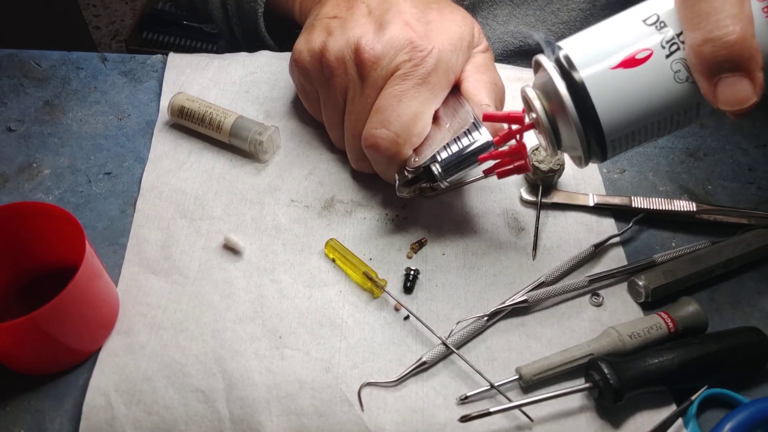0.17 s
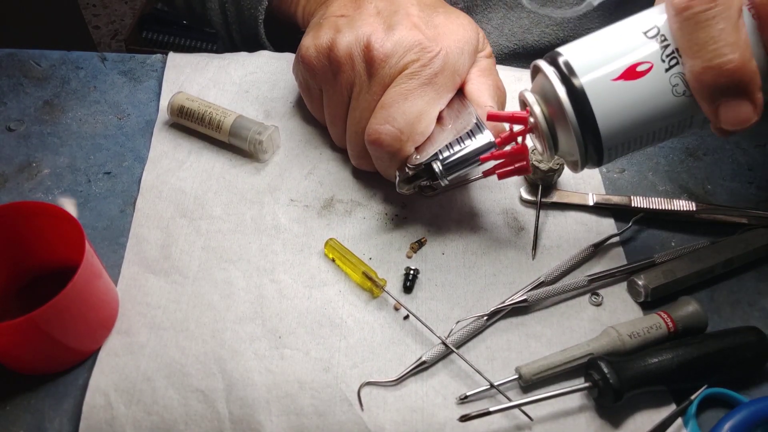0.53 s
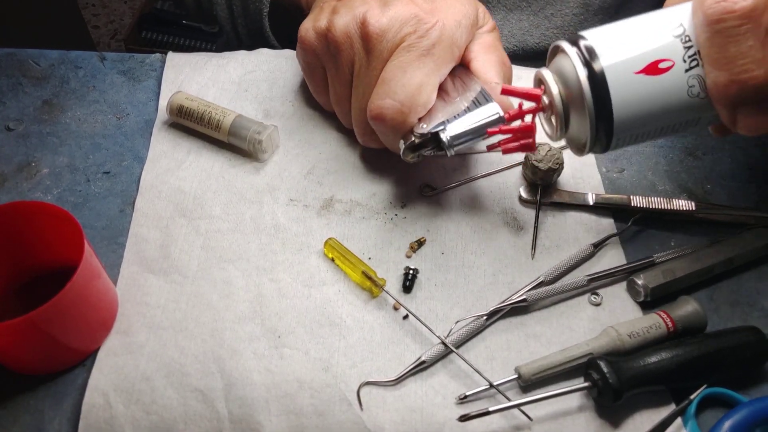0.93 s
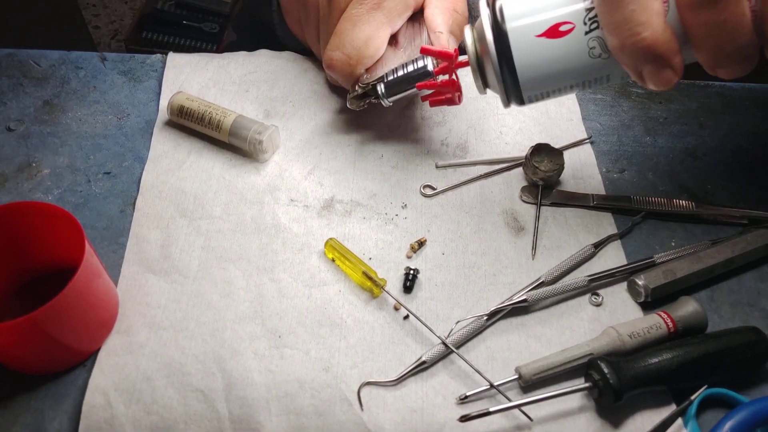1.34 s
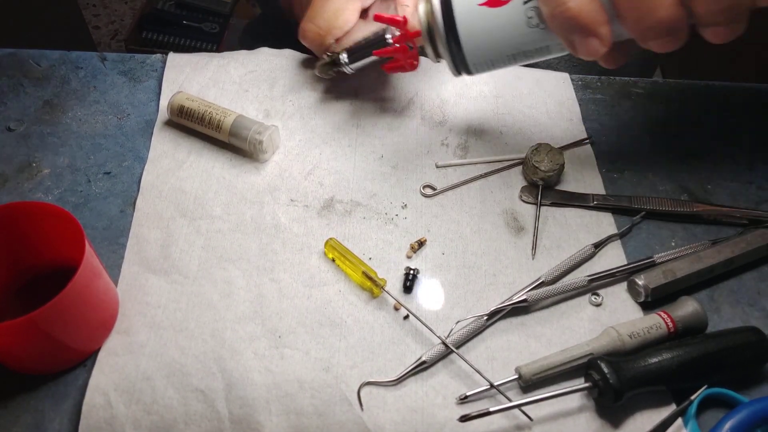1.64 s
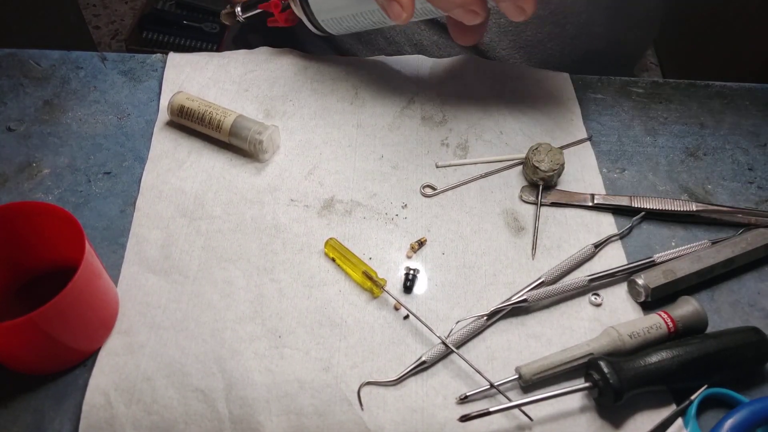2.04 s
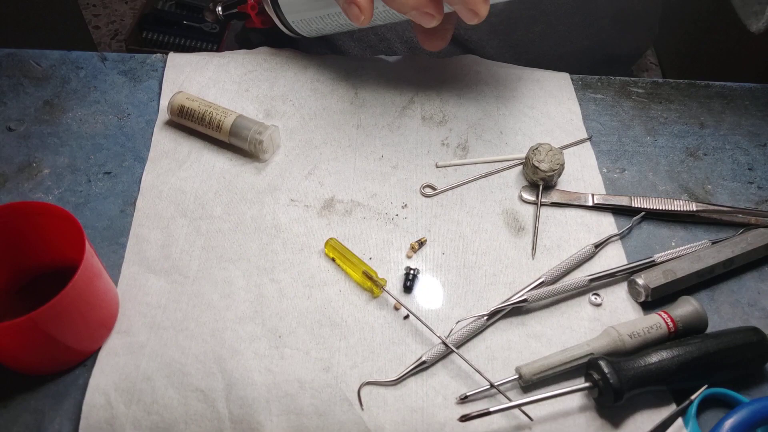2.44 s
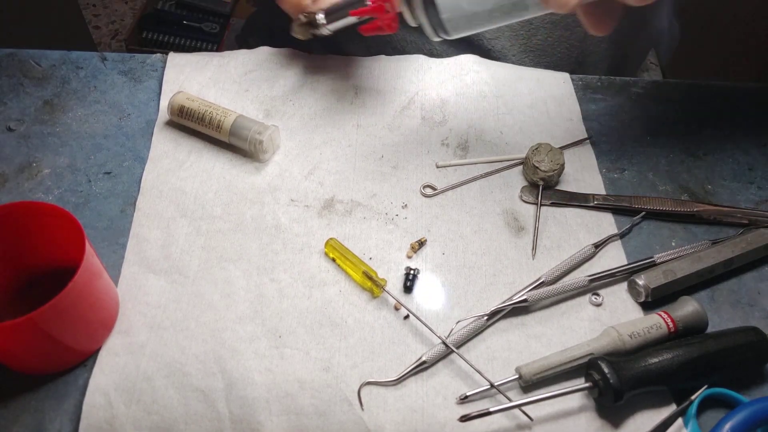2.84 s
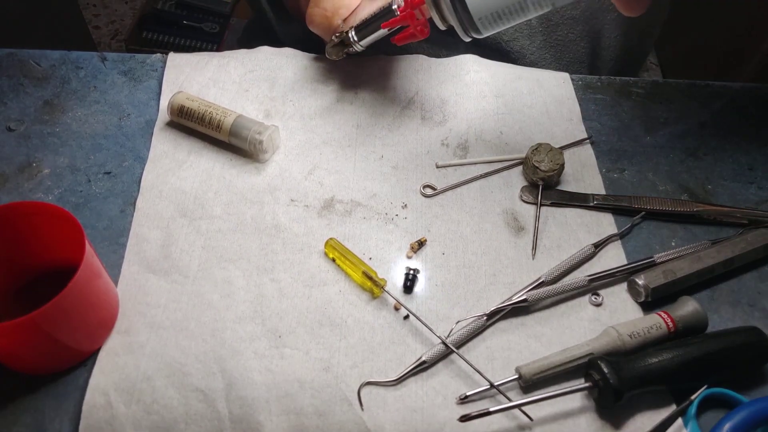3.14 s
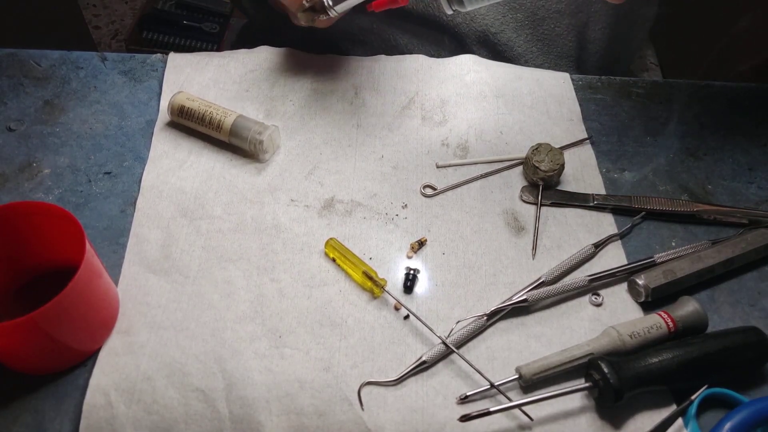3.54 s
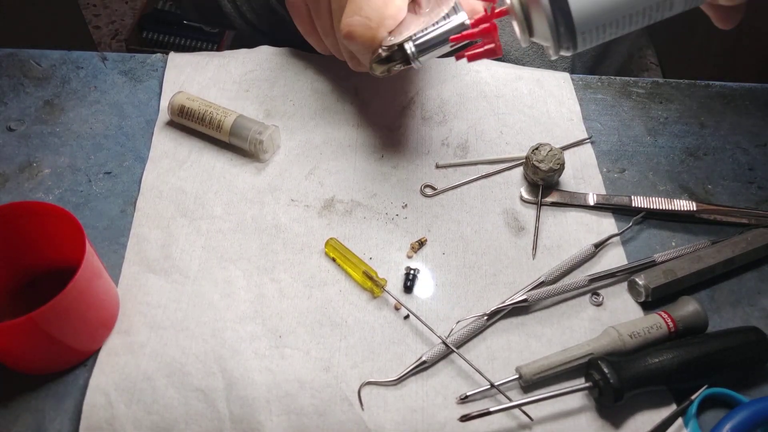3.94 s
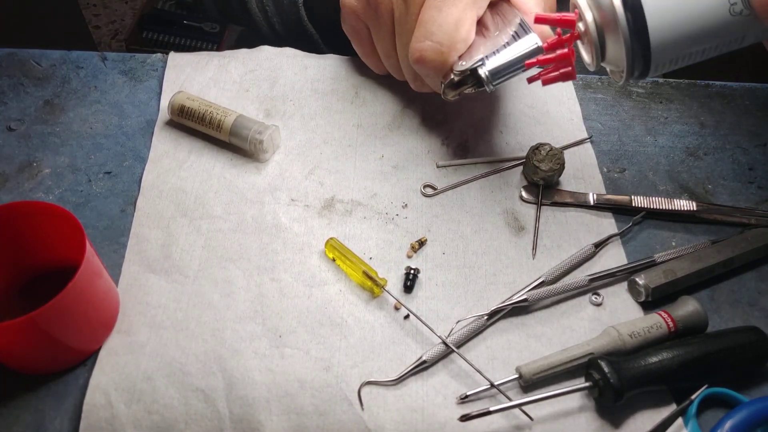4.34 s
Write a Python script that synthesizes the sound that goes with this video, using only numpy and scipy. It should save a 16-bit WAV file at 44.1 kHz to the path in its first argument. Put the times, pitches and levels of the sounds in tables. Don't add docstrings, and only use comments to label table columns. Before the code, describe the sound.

In a quiet room with a faint low hum, a small metal tick comes first, then a bright sputtering gas hiss from a refill can lasting over half a second. A long near-silent gap holds faint spits and soft can knocks. Then come several shorter hisses, some airy, some whistling, a sharp metal click, and a final strong hiss that runs to the end. Close stereo microphones, dry sound.

```python
import sys
import numpy as np
from scipy import signal
from scipy.fft import rfft, irfft, next_fast_len
from scipy.io import wavfile
from scipy.ndimage import uniform_filter1d, map_coordinates

SR = 44100
rng = np.random.default_rng(int(sys.argv[2]) if len(sys.argv) > 2 else 0)


def dump(signal):
    limited = np.clip(np.atleast_2d(signal).T, -1, 1)
    pcm = np.round(limited * 32767).astype(np.int16)
    wavfile.write(sys.argv[1], SR, pcm)


def magnitude_from_level(level_db):
    exponent = np.asarray(level_db, float) / 20
    return 10 ** exponent


N = 197552

# (pitch [Hz], level [dB per Hz])
ROOM_COLOUR = [(12, -18.5), (24, 7), (33, -14.5), (60, -1.5), (95, -18.5), (150, -3.5), (210, -8),
               (280, -14), (460, -12.5), (640, -19), (900, -26.5), (2400, -34), (4000, -42.5), (6500, -72)]
# (pitch [Hz], likeness [0-1])
ROOM_LIKENESS = [(60, .9), (180, .85), (550, .5), (1650, .1), (5000, .1)]
ROOM_DB = -59

# (pitch [Hz], level [dB per Hz])
JET_COLOUR = [(180, -75), (300, -23.5), (447, -21), (814, -18.5), (915, -23), (1150, -16), (1690, -25),
              (2650, -17.5), (3950, -19), (4830, -16), (5610, -17), (7690, -12.5), (10600, -28.5),
              (15000, -33.5), (16000, -43)]
# (lowest pitch [Hz], highest pitch [Hz])
REGION_EDGES = [
    (6000, 9400),
    (1800, 6000),
    (9400, 16500),
    (250, 1800),
]
NOZZLE_HZ, NOZZLE_WIDTH_HZ = 7666, 1040
DIRECT_SHARE = .53
TIGHT_DB, LOOSE_DB = (0.5, -23, -22, -36), (-1, -0.5, -10.5, -17.5)
TIGHT_FOCUS, LOOSE_FOCUS = 0.79, .25
LEAK_FOCUS = 0.35
# (time [s], flow [dB], gap round the nozzle [0 tight - 1 loose])
PRESS_1 = [(.232, -65.5, 0.68), (.27, -50.5, 0.41), (.35, -49, 0.7), (.4, -30.5, 0.34), (.52, -37.5, 0.75),
           (.78, -37.5, 0.8), (.82, -27, 0.45), (.92, -38.5, 0.59)]
PRESS_2 = [(1.947, -65.5, 1), (2.01, -61.5, 0.44), (2.07, -39.5, 0.083), (2.13, -32, .05),
           (2.22, -39, 0.58), (2.32, -55, 0.83), (2.41, -51, 0.87), (2.47, -47, 0.93)]
PRESS_3 = [(2.48, -36.5, 0.83), (2.52, -29.5, 0.61), (2.56, -31.5, 0.73), (2.61, -35.5, 0.89),
           (2.659, -44.5, 0.9)]
PRESS_4 = [(2.823, -53.5, 0.72), (2.86, -43.5, 0.67), (2.98, -34, 0.19), (3.05, -35.5, 0.3),
           (3.161, -30.5, 0.56), (3.23, -36, 0.88), (3.308, -23.5, 0.36), (3.4, -32, 0.38),
           (3.478, -42.5, 0.51)]
PRESS_5 = [(3.58, -68, 1), (3.64, -60, 1), (3.67, -57, 0.5), (3.7, -49.5, 0), (3.72, -47, 0.63),
           (3.79, -55.5, 0.64), (3.85, -49.5, .6)]
PRESS_6 = [(3.855, -56, 0.47), (3.91, -44.5, 0.42), (3.972, -44, 0.29), (4.05, -29, 0), (4.209, -39, 0.49),
           (4.258, -27, 0.053), (4.38, -29, 0.25), (4.48, -26.5, 0.53)]
# (top air [dB], low puff [dB])
AIM = [
    (-0.5, -0.5),
    (2.5, 4),
    (2, 0),
    (7, 5.5),
    (-10, 1),
    (1.5, 3),
]
OPEN_DB, OPEN_S = -5.5, 0.0092
CLOSE_DB_PER_S = 258
LINGER_DB, LINGER_DB_PER_S = (-22.5, -12.5, -37, -22.5), (132, 109, 200, 110)
# (time [s], flow [dB], gap [0-1], top air [dB], hold [s])
LEAKS = [
    (0.081, -70, 0.9, -30, 0.0044),
    (1.294, -64, 0.62, 1.5, 0.049),
    (1.38, -63.5, 0.95, -19, 0.0086),
    (1.462, -73, 0.8, -4, .02),
    (1.554, -61, 0.84, -7, 0.018),
    (1.784, -76, 0.63, -9, 0.16),
]
LEAK_PUFF_DB = 17
SEEP_DB = -85.5
# (time [s], splash of liquid [dB], step in flow [dB])
SLIPS = [(.2324, 10.5, 11), (0.3687, -4.5, 6.5), (0.8055, 9, 1), (1.948, 5.5, 3.5), (2.0363, -8.5, 8),
         (2.495, 5, 7), (2.526, 1, 7), (2.8694, -4, -2.5), (3.1396, 1.5, 1), (3.2824, 0, 5.5), (3.66, 3, 9),
         (3.8611, 1, 10), (3.9634, -4.5, 3.5), (4.2284, 3.5, 2), (4.379, 7, 2.5), (4.415, 0.5, 4)]
SPLASH_S, SPLASH_PUFF = 0.15, 1

# (time [s], peak [dB], thump [dB], crack [dB], step in flow [dB])
TICKS = [
    (0.0876, -34.5, -78, -92, 2),
    (2.829, -52.5, -58, -65, 1),
    (3.7162, -29, -44.5, -49, 13.5),
    (3.728, -41, -69, -67, 12),
    (3.7479, -51, -61, -74, 12),
]
# (pitch [Hz], level [dB], time to fall by 60 dB [s])
TICK_MODES = [(2600, -13, .012), (4600, -7, .02), (6500, -6, .015), (7500, 0, .016), (8300, -7, .01)]
RATTLE_T60_S = 0.084
# (time [s], peak [dB], pitch [Hz])
KNOCKS = [
    (1.468, -49.5, 541),
    (1.477, -47.5, 696),
    (1.485, -55, 620),
    (1.496, -47, 715),
    (1.508, -52, 664),
    (2.299, -53.5, 540),
    (2.857, -42, 710),
    (3.132, -48, 740),
    (3.72, -47, 680),
          (0.095, -56, 216),
    (3.728, -54, 214),
]

# (time [s], delay of the left port [samples])
LAG = [(0, 12.5), (.7, 4.6), (.9, 8.1), (2, 9.05), (2.7, 12.8), (3, 5.25), (3.5, 6.44), (4.1, 3.6),
       (4.48, 0.47)]
# (pitch [Hz], left minus right [dB])
PORTS = [(60, 9.5), (200, 9), (400, 7.5), (700, 4.5), (1300, 6), (2400, 3.5), (4400, 1.5), (6000, -2),
         (7600, -8), (9000, -4), (15000, -2)]
# (pitch [Hz], odds [higher = more])
DROPOUTS = [(700, -2.4), (1400, -1.8), (2200, -1.3), (3400, -.45), (4700, -.35), (5900, -.45), (7300, -2),
            (8500, -.55), (9700, -.2), (13000, 0), (15500, .6)]
# (start [s], end [s], pitch [Hz], width [Hz], added odds)
HOLLOWS = [(.28, .8, 3050, 74, 3.1), (.3, .8, 3880, 154, 0.73), (.4, .8, 6290, 131, 6.7),
           (.25, .8, 9780, 299, 3.5), (1.28, 1.7, 9960, 300, 3.1), (3.6, 3.86, 10100, 503, 2.2),
           (2.0, 2.5, 2392, 173, 2.8), (2.83, 3.5, 3890, 318, 1.6), (2.904, 3.315, 5510, 161, 3.1),
           (3.15, 3.5, 11000, 200, 1), (3.594, 3.9, 5430, 302, 1.6), (4.1, 4.35, 4530, 155, 5.7)]
HOP, BLOCK_START, TOP_HZ = 1024, 946, 15830
LOUD_DB, RELIEF_SPAN_DB = -50, 12
HOLE_BLOCKS, HOLE_LINES = 2.6, 1.6


def rms_one(x):
    return x / np.sqrt(np.mean(x ** 2) + 1e-20)


def in_time(rows):
    s, *columns = np.transpose(rows)
    return [np.interp(np.arange(N) / SR, s, c) for c in columns]


def at_hz(points, hz):
    table_hz, value = np.transpose(points)
    return np.interp(np.log(hz + 1), np.log(table_hz), value)


def coloured(x, gain_at):
    size = next_fast_len(N)
    hz = np.arange(size // 2 + 1) * SR / size
    return irfft(rfft(x, size) * gain_at(hz), size)[..., :N]


def drift(rate):
    r = np.exp(-2 * np.pi * rate / SR)
    noise = rng.standard_normal(N + 9000)
    return rms_one(signal.lfilter([1], [1, -2 * r, r * r], noise)[9000:])


def ring(clicks, hz, t60):
    r, w = magnitude_from_level(-60 / (t60 * SR)), 2 * np.pi * hz / SR
    return signal.lfilter([0, np.sin(w)], [1, -2 * r * np.cos(w), r * r], clicks + 1e-18)


def at_ports(x):
    late = np.arange(N) - in_time(LAG)[0]
    return np.array([map_coordinates(x, [late], order=3), x])


def room():
    mid, side = rng.standard_normal((2, N))
    alike = lambda hz: np.clip(at_hz(ROOM_LIKENESS, hz), -1, 1)
    mid = coloured(mid, lambda hz: magnitude_from_level(at_hz(ROOM_COLOUR, hz)) * np.sqrt(1 + alike(hz)))
    side = coloured(side, lambda hz: magnitude_from_level(at_hz(ROOM_COLOUR, hz)) * np.sqrt(1 - alike(hz)))
    return magnitude_from_level(ROOM_DB) * rms_one(np.array([mid + side, mid - side]))


def slips(rise_s=0.066, fall_s=0.013):
    t, out = np.arange(N) / SR, 0
    for s, *others, step_db in SLIPS + TICKS[:3]:
        away = np.abs(t - s)
        swing = np.where(t < s, -np.exp(-away / rise_s), np.exp(-away / fall_s))
        out = out + step_db / 2 * swing
    return uniform_filter1d(out, size=90)


def fading(db, db_per_s):
    slope = np.reshape(db_per_s, (-1, 1)) * np.arange(N) / SR
    return np.maximum.accumulate(db + slope, axis=1) - slope


def regions(flow_db, gap, air_db, puff_db):
    tight, loose = np.reshape(TIGHT_DB, (-1, 1)), np.reshape(LOOSE_DB, (-1, 1))
    none = 0 * gap
    aim = np.array([none, none, air_db + none, puff_db + none])
    return flow_db + tight + gap * (loose - tight) + aim


def valve():
    t, shut = np.arange(N) / SR, -200
    splash = sum((t >= s) * db * np.exp(-np.abs(t - s) / SPLASH_S) for s, db, step_db in SLIPS)
    pressed, leaked, gap = np.full((4, N), shut), np.full((4, N), shut), np.ones(N)
    presses = [PRESS_1, PRESS_2, PRESS_3, PRESS_4, PRESS_5, PRESS_6]
    for rows, (air_db, puff_db) in zip(presses, AIM):
        start, end = rows[0][0], rows[-1][0]
        flow_db, fit = in_time(rows)
        opening = OPEN_DB * np.exp(-np.abs(t - start) / OPEN_S)
        flow_db = flow_db + opening - CLOSE_DB_PER_S * np.maximum(t - end, 0)
        levels = regions(flow_db, fit, air_db + splash, puff_db + SPLASH_PUFF * splash)
        now = t >= start
        pressed = np.where(now, levels, pressed)
        gap = np.where(now, fit, gap)
    for s, flow_db, fit, air_db, hold_s in LEAKS:
        levels = regions(flow_db, np.full(N, fit), air_db, LEAK_PUFF_DB)
        leaked = np.where((t >= s) & (t < s + hold_s), levels, leaked)
    leftover = np.maximum(pressed + np.reshape(LINGER_DB, (-1, 1)), leaked)
    lingering = fading(leftover, LINGER_DB_PER_S)
    seeping = regions(SEEP_DB, np.ones(N), 0, 0)
    power = sum(magnitude_from_level(2 * db) for db in (pressed, lingering, seeping))
    press_focus = TIGHT_FOCUS + gap * (LOOSE_FOCUS - TIGHT_FOCUS)
    return 10 * np.log10(power), np.where(pressed[0] > lingering[0], press_focus, LEAK_FOCUS)


def jet(sputter_db=-0.5, spit_db=0.0, trim_db=(1.5, 1.5, 1.5, 1.5)):
    levels_db, focus = valve()
    focus = np.clip(focus, 0, 1)
    direct = at_ports(rng.standard_normal(N))
    scattered = rng.standard_normal((2, N))
    noise = np.sqrt(DIRECT_SHARE) * direct + np.sqrt(1 - DIRECT_SHARE) * scattered
    sputter = sputter_db * drift(22) + spit_db * drift(340) + slips()
    layers = []
    for low, high in REGION_EDGES:
        edge = lambda hz: 1 / np.sqrt((1 + (low / (hz + 1)) ** 16) * (1 + (hz / high) ** 16))
        layers.append(rms_one(coloured(noise, lambda hz: magnitude_from_level(at_hz(JET_COLOUR, hz)) * edge(hz))))
    ringing = coloured(layers[0], lambda hz: 1 / (1 + (2 * (hz - NOZZLE_HZ) / NOZZLE_WIDTH_HZ) ** 2))
    layers[0] = focus * rms_one(ringing) + (1 - focus) * layers[0]
    out = 0
    for trim, level_db, layer in zip(trim_db, levels_db, layers):
        out = out + magnitude_from_level(trim + level_db + 0.43 * drift(36)) * layer
    return magnitude_from_level(sputter) * out


def ticks():
    out, thumps, cracks, t = np.zeros(N), np.zeros(N), np.zeros(N), np.arange(N) / SR
    rattle = rng.standard_normal((3, N))
    for s, peak_db, thump_db, crack_db, step_db in TICKS:
        after = np.maximum(t - s, 0)
        push = (t >= s) * rattle[0] * magnitude_from_level(-21 - 60 * after / RATTLE_T60_S)
        push[round(s * SR)] += 1
        metal = sum(magnitude_from_level(db) * ring(push, hz, decay) for hz, db, decay in TICK_MODES)
        out += magnitude_from_level(peak_db - 7.0) * metal
        thumps += (after > .003) * magnitude_from_level(thump_db - 1.5 - 60 * after / 0.32)
        cracks += (t >= s) * magnitude_from_level(crack_db + 10 - 60 * after / .015)
    body = signal.sosfilt(signal.butter(2, [200, 1100], "band", fs=SR, output="sos"), rattle[1])
    out = signal.sosfilt(signal.butter(6, 9000, fs=SR, output="sos"), out)
    return out + thumps * rms_one(body) + cracks * rattle[2]


def knocks():
    out = np.zeros(N)
    for s, peak_db, hz in KNOCKS:
        click = np.zeros(N)
        click[round(s * SR)] = magnitude_from_level(peak_db + 5.5)
        out += ring(click, hz, 24 / hz)
    return signal.lfilter([.15], [1, -.85], out)


def scene():
    return room() + jet() + at_ports(ticks() + knocks())


def thinned(x, ripple_db=5.5):
    n, k = np.arange(2 * HOP) + .5, np.arange(HOP) + .5
    waves = np.cos(np.pi / HOP * np.outer(k, n + HOP / 2))
    basis = np.sqrt(2 / HOP) * np.sin(np.pi * n / 2 / HOP) * waves
    pad, count = 2 * HOP - BLOCK_START, N // HOP + 3
    blocks = np.pad(x, ((0, 0), (pad, (count + 1) * HOP - pad - N))).reshape(2, -1, HOP)
    pairs = np.concatenate([blocks[:, :-1], blocks[:, 1:]], axis=2)
    lines = basis @ pairs.transpose(0, 2, 1)
    hz, s = k * SR / 2 / HOP, ((np.arange(count) + 1) * HOP - pad) / SR

    chance = rng.standard_normal((3, HOP, count))
    luck = signal.lfilter([1], [1, -np.exp(-1 / HOLE_BLOCKS)], chance, axis=2)
    spread = np.exp(-.5 * (np.arange(-12, 13) / HOLE_LINES) ** 2)
    luck = rms_one(signal.fftconvolve(luck, spread[None, :, None], "same"))

    level_db = 10 * np.log10(np.mean(lines ** 2, axis=(0, 1)) + 1e-12)
    relief = np.clip((LOUD_DB - level_db) / RELIEF_SPAN_DB, 0, 1) * (hz[:, None] < 9300)
    odds = at_hz(DROPOUTS, hz)[:, None] - relief
    for start, end, centre_hz, width_hz, more in HOLLOWS:
        dip = np.exp(-((hz - centre_hz) / width_hz) ** 2)
        odds = odds + more * np.outer(dip, (s > start) & (s < end))
    kept = 1. * (luck[2] > odds)
    ripple = magnitude_from_level(ripple_db * (0.72 * luck[:2] + 0.47 * luck[2]) * (hz[:, None] > 900))
    gain = kept * ripple / np.sqrt(uniform_filter1d(kept, size=60, axis=0) + 0.092)
    near_tick = np.abs(s[:, None] - np.array(TICKS)[:3, 0]).min(axis=1) < HOP / SR
    lines = lines * np.where(near_tick, 1, gain) * (hz[:, None] < TOP_HZ)

    pairs = (basis.T @ lines).transpose(0, 2, 1)
    first = np.pad(pairs[..., :HOP], ((0, 0), (0, 1), (0, 0)))
    second = np.pad(pairs[..., HOP:], ((0, 0), (1, 0), (0, 0)))
    return (first + second).reshape(2, -1)[:, pad:pad + N]


def top_cut(x):
    return signal.sosfilt(signal.butter(12, 16610, fs=SR, output="sos"), x)


def record(dry):
    sides = np.array([[.5], [-.5]])
    ports = coloured(dry, lambda hz: magnitude_from_level(at_hz(PORTS, hz) * sides))
    mix = thinned(ports)
    return top_cut(mix)


dry = scene()
out = record(dry)
dump(out)
```